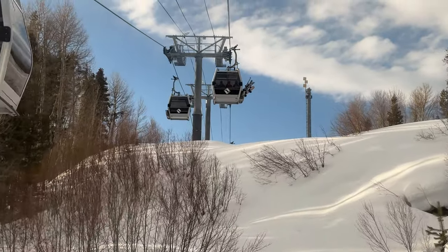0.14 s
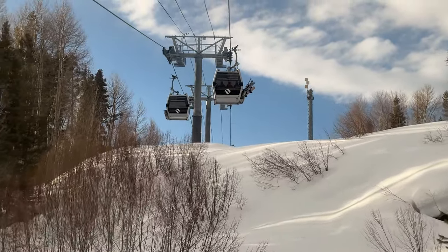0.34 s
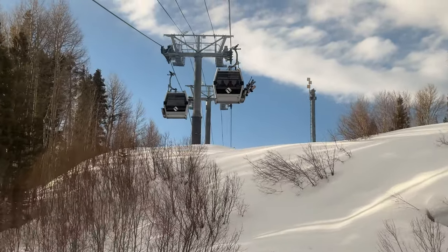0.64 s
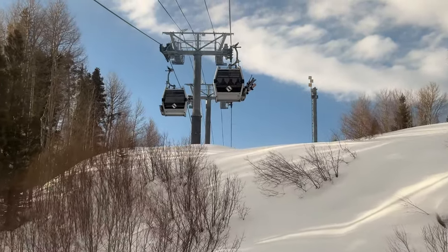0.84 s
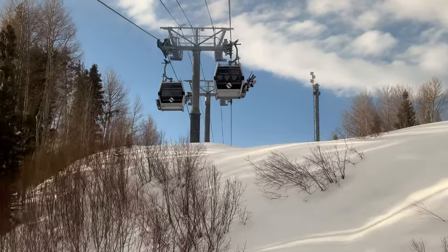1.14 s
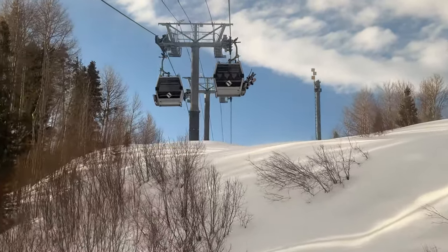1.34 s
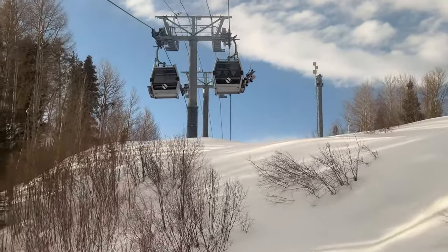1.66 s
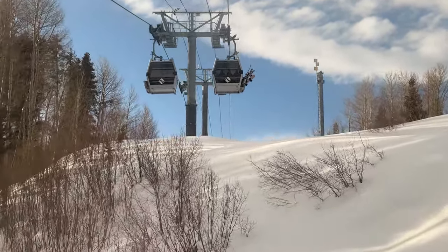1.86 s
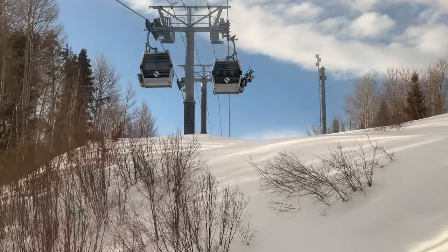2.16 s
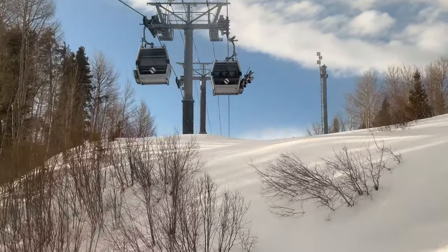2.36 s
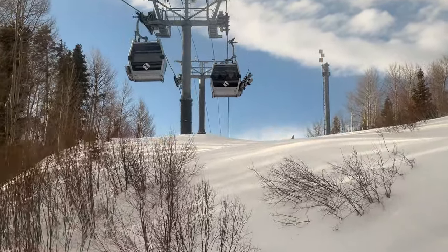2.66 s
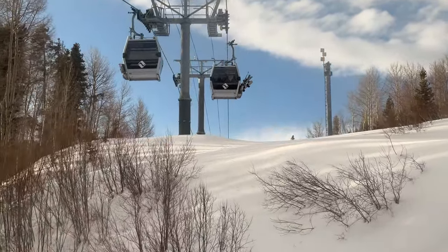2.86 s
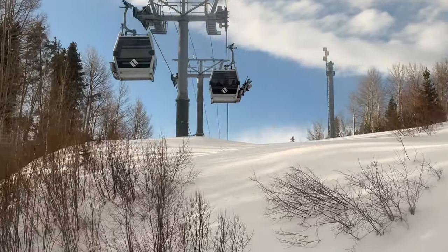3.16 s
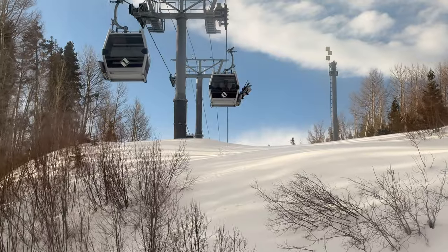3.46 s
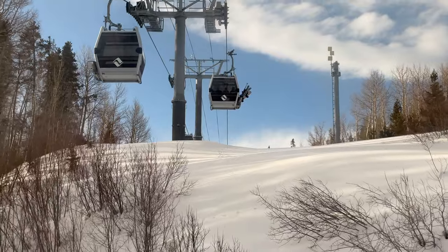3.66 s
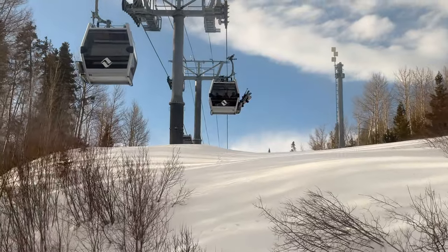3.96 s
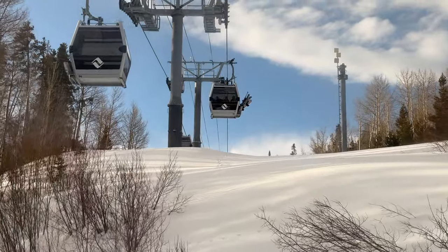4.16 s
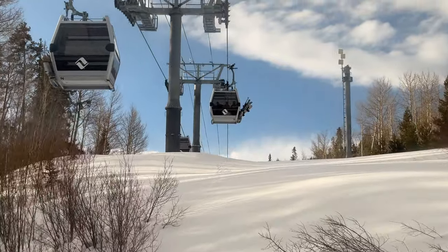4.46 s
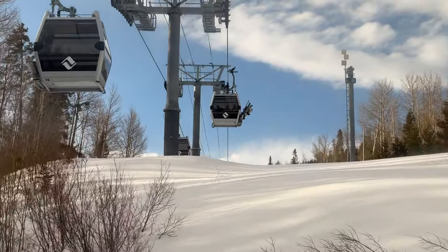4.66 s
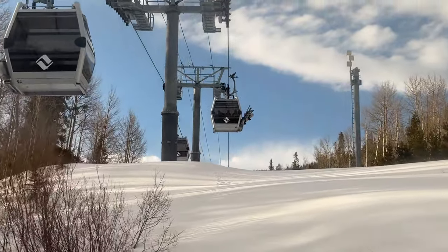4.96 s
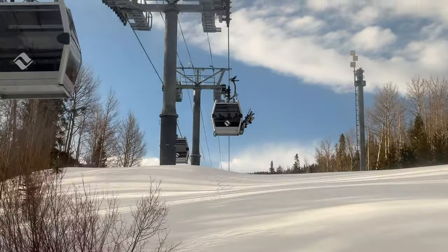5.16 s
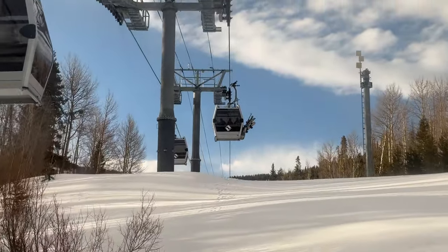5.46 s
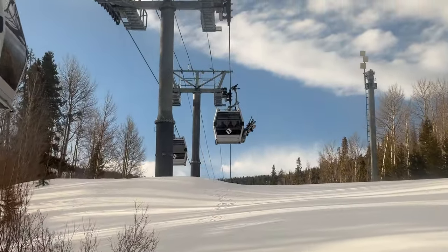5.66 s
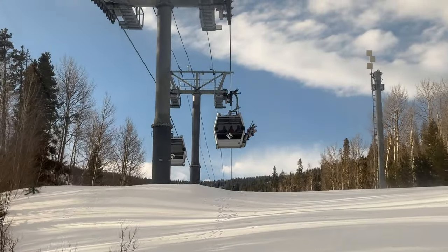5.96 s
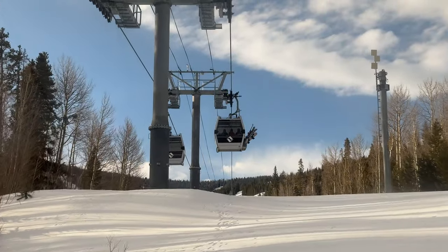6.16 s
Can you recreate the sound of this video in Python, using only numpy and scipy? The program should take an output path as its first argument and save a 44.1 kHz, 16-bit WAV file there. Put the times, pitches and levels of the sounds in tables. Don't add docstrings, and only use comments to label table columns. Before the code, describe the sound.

Close nylon rustling, small ticks, a short zip and hollow bench knocks over a deep, wavering cable hum that slowly swells.

```python
import sys
import numpy as np
from scipy import signal
from scipy.fft import rfft, irfft, next_fast_len
from scipy.io import wavfile
from scipy.ndimage import uniform_filter1d, map_coordinates

SR = 44100
rng = np.random.default_rng(int(sys.argv[2]) if len(sys.argv) > 2 else 0)


def gain_from_db(level_db):
    decades = np.asarray(level_db, float) / 20
    return 10 ** decades


def transcribe(signal):
    frames = np.atleast_2d(signal).T
    limited = np.clip(frames, -1, 1)
    pcm = np.round(limited * 32767).astype(np.int16)
    wavfile.write(sys.argv[1], SR, pcm)


N = 278271
TIME = np.arange(N) / SR

# start t/s, length t/s, level/dB, brightness level/dB
CLOTH_PULLS = [(0.0, 0.12, -56.5, 0), (.16, 0.13, -61, -1.5), (.43, 0.12, -62, 1), (.9, 0.37, -57, 1.5),
               (1.6, 0.16, -61.5, -2), (1.8, 0.18, -57.5, 1), (2.36, 0.15, -59, -6),
               (2.47, 0.13, -53.5, -1), (2.64, 0.12, -51.5, -4), (2.92, 0.15, -57.5, 1),
               (3.25, 0.31, -57.5, 0.5), (3.86, 0.22, -60, 9.5), (4.115, 0.097, -53, 0.5),
               (4.5, 0.16, -55, -2.5), (4.7, 0.058, -58.5, -3.5), (4.78, 0.048, -55.5, -4),
               (5.18, 0.18, -56.5, -1.5), (5.85, 0.14, -52.5, 1), (5.96, 0.17, -49.5, -1),
               (6.24, 0.074, -53, -1)]
# start t/s, length t/s, level/dB, brightness level/dB
CLOTH_JERKS = [(0.0, 0.035, -68, -1), (.13, 0.11, -60, 0.5), (.79, 0.057, -65, -3.5),
               (2.69, 0.041, -57.5, -2), (2.79, 0.066, -59, -2), (3.66, 0.073, -55, -2),
               (6.09, 0.05, -53, 3), (6.16, 0.071, -59, 2.5), (.56, 0.2, -59, 0.5), (.72, 0.2, -61, 1),
               (1.27, 0.076, -53, 0), (1.36, 0.12, -62.5, 0.5), (2.0, .35, -58.5, 1),
               (2.51, 0.028, -60, -13), (2.6, 0.18, -53, 1), (3.07, 0.18, -60.5, -1.5),
               (3.56, 0.18, -57, 1), (3.74, 0.33, -56, -1), (3.92, 0.22, -58, -3.5),
               (4.07, 0.088, -56.5, 3), (4.241, 0.18, -52, 1.5), (4.41, 0.25, -62, 8.5),
               (5.005, 0.065, -54.5, -4), (5.09, 0.028, -56, 3), (5.355, 0.088, -49.5, -3),
               (5.41, 0.14, -48, -1.5), (5.47, 0.13, -50.5, -2), (5.55, 0.27, -49.5, -0.5),
               (5.985, 0.13, -46.5, -1.5)]
# level/dB against the movement, share of brightness [ratio], rest level/dB, catch level/dB
CLOTH_LAYERS = [
    (4.5, -1.47, -61, 1.45),
    (1.5, -0.057, -66, 1.18),
    (-8.5, 0.64, -74, 0.25),
    (1, 1, -64, -0.13),
]
# f/Hz, density level/dB per Hz
RUB_SPECTRUM = [(180, -3), (300, 2), (370, 2.5), (500, -2.5), (800, -3.5), (1100, -16), (1500, -59)]
SCRATCH_SPECTRUM = [(700, -8), (1000, -1), (1350, -1), (1600, -5), (1850, -3), (2500, -6), (3000, -12.5),
                    (3900, -22.5)]
CRISP_SPECTRUM = [(2200, -18), (2800, -2), (3600, 1), (4500, -2), (5200, -35)]
SWISH_SPECTRUM = [(4000, -19), (4900, -2), (6500, -3), (8300, 2.5), (10000, -5), (11000, -13),
                  (13000, -17.5), (14200, -12), (15700, -12.5)]
# t/s, rib rate f/Hz, pressure level/dB
ZIP_STROKE = [
    (2.5, 355, -56),
    (2.54, 436, -45),
    (2.565, 424, -45),
    (2.59, 545, -42),
    (2.618, 692, -44),
    (2.652, 680, -43),
    (2.67, 545, -43),
    (2.696, 325, -45),
    (2.722, 240, -48),
]
# t/s, level/dB added to the overtones
RIB_SLIPS = [(2.515, -12), (2.527, -12), (2.572, -5), (2.598, -4), (2.612, -12), (2.644, -11), (2.655, 5),
             (2.665, -11), (2.679, -8), (2.687, -18), (2.72, -8)]
# f/Hz, level/dB
SLEEVE = [(250, -16), (430, -5), (520, -3), (610, 4), (760, -1), (1100, 5), (1230, -1), (1390, 6),
          (1600, -6)]
# t/s, peak level/dB, centre f/Hz, thud level/dB against the tick
CREASE_TICKS = [(0.5692, -37.5, 2168, -20), (0.6003, -40.5, 1170, -13), (.035, -49, 730, -8),
                (.214, -58, 970, -8), (.279, -43, 1330, -12), (.588, -50, 1160, -15),
                (0.6831, -43, 1160, -17), (0.7849, -35, 1970, -26), (.786, -39, 1140, -22),
                (1.17, -54, 1225, 10), (2.436, -49, 630, -8), (2.4642, -49, 700.5, -3),
                (2.519, -34, 1071, -4), (2.724, -36, 1300, -9), (2.759, -34, 1794, -18),
                (2.761, -32, 816, -13), (2.771, -34.5, 1450, -7), (2.8144, -38.5, 1180, -2),
                (3.0125, -40.5, 1200, -21), (3.458, -40, 1302, -1), (3.674, -37.5, 1215, -13),
                (3.7359, -41, 1260, -12), (3.737, -37, 2250, -13), (3.77, -39, 1290, -13),
                (3.826, -46, 840, -12), (3.855, -46, 696.7, 9.5), (3.91, -44, 700.5, -3),
                (3.928, -36.5, 830, -8), (3.9667, -35.5, 860, -16), (3.968, -36, 2900, -20),
                (4.07, -42, 652, 0), (4.114, -41, 902, -10), (4.16, -42, 1085, -16), (4.249, -43, 1890, -15),
                (4.3843, -41, 2330, 5.5), (4.4739, -43, 947.4, -1), (4.478, -36.5, 2187, -20),
                (4.62, -38, 2000, -13), (4.64, -38, 820.7, -2), (4.82, -44, 1802, -8),
                (5.2856, -43, 1170, 3), (5.3022, -41, 2500, -22), (5.419, -38, 696, 0),
                (5.833, -32.5, 2077, -2.5), (5.842, -40, 960, 0), (5.9728, -31.5, 1079, -6),
                (5.9917, -34, 1075, -27), (6.0444, -31.5, 875, -21), (6.137, -37, 924, -28),
                (6.2881, -51, 918, -3), (6.3024, -42, 1900, -10),
                (.517, -48, 1500, -20), (.617, -48, 750, -10), (.628, -50, 960, -12),
                 (.694, -48, 1350, -20), (.797, -41, 1700, -23), (.812, -43, 1900, -20),
                 (3.467, -44, 600, -8), (3.553, -44, 1330, -20), (3.567, -46, 1500, -20),
                 (3.63, -43, 2000, -20), (3.684, -38, 1200, -7), (3.7, -44, 950, -12),
                 (3.751, -48, 1450, -20), (3.762, -48, 1250, -20), (3.84, -39, 2350, -20),
                 (3.849, -39, 1850, -20), (3.868, -44, 1200, 0), (3.982, -45, 1750, -12),
                 (4.955, -54, 597, -8), (5.075, -49, 900, -10), (5.11, -44, 520, -3)]
# t/s, peak level/dB, 60 dB decay t/s
STATIC_SNAPS = [
    (3.345, -30, 0.03),
    (5.007, -31, 0.062),
    (5.0926, -26, 0.038),
    (5.358, -24, 0.024),
    (6.139, -25, 0.016),
    (6.3024, -27, 0.023),
]
# t/s, peak level/dB
BENCH_KNOCKS = [
    (5.007, -24.5),
    (5.365, -38),
    (5.418, -48),
]
# f/Hz, level/dB, 60 dB decay t/s
BENCH_MODES = [(259.9, -2, .08), (370, 11.5, 0.075), (457, 6, 0.053), (564, 11.5, 0.037), (674, 13, 0.025),
               (837, 7.5, 0.047), (1040, 4, 0.024), (1410, -7, 0.018), (1900, -19, .03), (2702, -10, 0.016)]
# start t/s, end t/s, f/Hz, width f/Hz, level/dB
SQUEAKS_AND_BRUSHES = [(.03, .36, 1250, 450, -61), (1.65, 1.74, 10800, 300, -72),
                       (3.655, 3.78, 7670, 70, -56.5), (3.655, 3.8, 13870, 220, -66),
                       (3.655, 3.7, 10000, 450, -63), (3.5, 3.7, 5100, 250, -66), (0, .3, 2200, 500, -63),
                       (.58, .66, 1000, 500, -59), (2.69, 2.75, 1100, 350, -50),
                       (6.07, 6.15, 3000, 500, -55), (3.52, 3.57, 9700, 500, -66),
                       (4.362, 4.4, 2370, 80, -53), (4.03, 4.09, 6200, 700, -59),
                       (5.9, 5.99, 2000, 110, -61), (6.095, 6.16, 4800, 1300, -52),
                       (.07, .16, 1200, 90, -59), (.2, .27, 1020, 70, -58)]
# t/s, f/Hz, level/dB, half width t/s
SOFT_BURSTS = [(.1, 403, -53, .012), (2.543, 440, -46, .006), (2.527, 301.7, -40.5, 0.0053),
               (2.666, 590, -38, .005), (2.716, 816, -44, 0.0055), (2.774, 325, -44.5, 0.0046),
               (3.681, 410, -54, .008), (4.197, 470, -42, 0.0045), (5.29, 252, -43.5, 0.0062),
               (5.37, 333, -37, 0.0064), (5.37, 543, -46.5, 0.0095), (5.41, 175.3, -38.5, .015),
               (5.429, 246, -42, 0.023), (5.465, 360.2, -38.5, 0.013), (5.52, 648, -47, .01),
               (5.58, 269.9, -43, 0.0092), (5.605, 361.5, -47, 0.01), (5.66, 280, -44.5, 0.013),
               (5.699, 194.1, -42, 0.031), (5.74, 373.3, -44, 0.011), (5.789, 176.1, -41, .015),
               (5.94, 248, -45, 0.01), (6.2, 182, -48, 0.032)]
# t/s, level/dB, f/Hz, 60 dB decay t/s
HANGER_JOLT = (1.04, -23, 33.5, 0.75)
# t/s, strand pitch f/Hz, strand level/dB
ROPE_STRAND = [(0.0, 81.5, -35.5), (.35, 82.86, -46.5), (.8, 82.84, -38), (.96, 82.7, -61),
               (1.2, 84.8, -40.5), (1.85, 85.13, -32), (2.4, 85.17, -35.5), (2.7, 85.37, -32.5),
               (3.45, 85.34, -34), (3.62, 84.96, -28), (3.83, 86.16, -36.5), (4.04, 85, -25),
               (4.24, 85.67, -34.5), (4.94, 85.4, -30), (5.18, 85.3, -29.5), (5.41, 85.4, -26),
               (6.03, 84.24, -30.5), (6.31, 84.6, -25.5)]
# multiple [count], level/dB against the drone
TWIST_MULTIPLES = [(2, -9), (4, -8), (8, -10), (10, -14), (12, -12), (18, -20)]
# f/Hz, density level/dB per Hz
SHELL_DRONE = [(12, -22), (20, -23), (65, -7.5), (90, -5.5), (111, -9.5), (135, -9.5), (226, -21.5),
               (334, -27.5), (500, -34), (650, -40.5), (1100, -120)]
# t/s, level/dB
SHELL_BUMPS = [(.45, -73), (.7, -62), (1.37, -49.5), (2.05, -52), (3.0, -56), (3.34, -49.5), (3.7, -46.5),
               (4.34, -52), (4.67, -56), (5.06, -51), (5.41, -44), (5.71, -48.5)]
# t/s, level/dB
CABIN_SWINGS = [(.4, -50), (.9, -35), (1.67, -31), (1.95, -38), (2.2, -46), (2.5, -34), (2.8, -42),
                (3.05, -28.5), (3.35, -31.5), (3.87, -41), (4.17, -33.5), (4.58, -31), (5.18, -35),
                (5.65, -54), (6.03, -39)]
# t/s, level/dB
WHEEL_LOADS = [(.8, -38), (1.08, -34), (1.38, -31.5), (1.78, -31), (2.0, -36), (2.29, -28), (2.49, -29.5),
               (2.8, -31), (3.02, -34), (3.4, -29), (3.74, -39), (3.95, -39), (4.44, -34), (4.94, -30.5),
               (5.2, -43), (5.65, -40), (5.85, -40), (6.04, -34), (6.3, -32)]
# f/Hz, correlation [ratio]
PORT_LIKENESS = [(25, 0.81), (130, 0.76), (400, 0.79), (1000, 0.55), (1500, 0.93), (1900, 0.98),
                 (7000, 0.93), (13000, 0.85)]
# f/Hz, phase [half cycles]
NEAR_PHASE = [(100, 0), (600, .45), (2050, 0), (3500, .18), (5900, 0), (10000, .22), (11800, 0),
              (15700, -.67)]
# f/Hz, level/dB
LEFT_NEARER = [(200, 1), (400, 0.5), (800, 1.6), (1300, -.5), (2200, 1)]

STRANDS = 6
CANCEL_HZ = 8250
SIDES = np.array([[1], [-1]])


def unit(x):
    return x / np.sqrt(np.mean(x ** 2) + 1e-20)


def along(points, hz):
    f, v = np.transpose(points)
    return np.interp(np.log(hz + 1), np.log(f + 1), v)


def curves(rows):
    s, *cols = np.transpose(rows)
    return [np.interp(TIME, s, c) for c in cols]


def wobble(rate):
    knots = rng.standard_normal(int(N * rate / SR) + 4)
    steps = np.arange(8 * len(knots)) / 8
    return np.interp(TIME * rate, steps, map_coordinates(knots, [steps], mode="nearest"))


def filtered(x, response):
    m = next_fast_len(N + SR // 2)
    return irfft(rfft(x, m) * response(np.fft.rfftfreq(m, 1 / SR)), m)[..., :N]


def swells(rows, half_s, rest_db):
    s, db = np.transpose(rows)[:, :, None]
    t = TIME[::50]
    bells = np.sum(gain_from_db(db) * np.exp(-.5 * ((t - s) / half_s) ** 2), axis=0)
    return gain_from_db(rest_db) + np.interp(TIME, t, bells)


def at_ports(pair, spectrum):
    def split(hz):
        apart = np.clip(abs(hz - CANCEL_HZ) / 400 - 1, 0, 1)
        turn = apart * np.arccos(np.clip(along(PORT_LIKENESS, hz), -1, 1)) / 2
        return gain_from_db(along(spectrum, hz)) * [np.cos(turn), np.sin(turn)]

    same, other = filtered(pair, split)
    return np.array([same + other, same - other]) / np.sqrt(np.mean(same ** 2))


def catches(rate, fade_s):
    kicks = (rng.random(N) < rate / SR) * rng.random(N)
    pull = signal.lfilter([1], [1, -np.exp(-1 / (fade_s * SR))], kicks)
    return unit(pull - uniform_filter1d(pull, SR // 12))


def patches(depth_db):
    z = signal.stft(rng.standard_normal((2, N)), nperseg=256)[2]
    field = uniform_filter1d(rng.standard_normal(z.shape[1:]), 5, 0)
    field = uniform_filter1d(field, 8, 1)
    return signal.istft(z * gain_from_db(depth_db * unit(field)), nperseg=256)[1][:, :N]


def movement(bright_share):
    power = np.zeros(N)
    start_s, stop_db_per_s = 0.013, 270
    for rows, first_db, last_db in ((CLOTH_PULLS, -9, 0), (CLOTH_JERKS, 0, -4.5)):
        for s, length, db, bright_db in rows:
            span = slice(round(s * SR), round((s + length) * SR) + SR // 5)
            t = TIME[span] - s
            shape_db = np.interp(t, [0, length], [first_db, last_db])
            shape_db = shape_db - stop_db_per_s * np.clip(t - length, 0, None)
            gain = np.clip(t / start_s, 0, 1) * gain_from_db(db + bright_share * bright_db + shape_db)
            power[span] += gain ** 2
    return power


def clothing():
    shared = 0.23 * catches(300, fade_s=0.001) + catches(70, fade_s=0.006)
    shared = np.minimum(shared, 2.6)
    spectra = (RUB_SPECTRUM, SCRATCH_SPECTRUM, CRISP_SPECTRUM, SWISH_SPECTRUM)
    out = 0
    for (lift_db, bright_share, rest_db, catch_db), spectrum in zip(CLOTH_LAYERS, spectra):
        gain = np.sqrt(gain_from_db(rest_db) ** 2 + gain_from_db(lift_db) ** 2 * movement(bright_share))
        noise = patches(depth_db=1.32) * gain_from_db(catch_db * shared)
        out = out + gain * at_ports(noise, spectrum)
    return out


def zip_stroke():
    rib_hz, press_db = curves(ZIP_STROKE)
    rib_hz = uniform_filter1d(rib_hz, SR // 70)
    phase = 2 * np.pi * np.cumsum(rib_hz * (1 + .015 * wobble(220))) / SR
    edge_s = np.minimum(TIME - ZIP_STROKE[0][0], ZIP_STROKE[-1][0] - TIME)
    stroke = np.clip(edge_s / 0.014, 0, 1)
    slip_db = sum(db * np.exp(-.5 * ((TIME - s) / .0042) ** 2) for s, db in RIB_SLIPS)
    low_db = -5 + np.clip(slip_db / 4, -2, 0) - 14 * np.clip((TIME - 2.672) / .008, 0, 1)
    partials = 0
    for k, db, pan_db in ((1, low_db, 2), (2, slip_db, -1), (3, -19 + slip_db, 0)):
        level_db = along(SLEEVE, k * rib_hz) + db + 0.87 * wobble(130) + pan_db * SIDES
        partials = partials + gain_from_db(level_db) * np.sin(k * phase)
    scrape = wobble(5000) * (1 + np.cos(phase))
    grate = filtered(scrape, lambda hz: np.clip(hz / 900, 0, 1) ** 2)
    grate = gain_from_db(-45.0 + 1.45 * catches(310, fade_s=0.0043)) * grate
    return stroke * (gain_from_db(press_db + 7.5) * partials + gain_from_db(press_db - press_db.max()) ** .5 * grate)


def ticks():
    out, t = np.zeros((2, N + SR)), np.arange(SR // 20) / SR
    events = CREASE_TICKS
    for (s, db, hz, thud_db), pan_db in zip(events, 4 * rng.standard_normal(len(events))):
        ring = gain_from_db(-60 * t * hz / 10) * (1 - np.exp(-t * hz * 1.2)) * np.sin(2 * np.pi * hz * t)
        thud = gain_from_db(thud_db - 60 * t / 0.0068) * np.sin(2 * np.pi * 640 * t)
        scratch = 0.26 * gain_from_db(-60 * t / 0.022) * rng.standard_normal(len(t))
        start = round(s * SR)
        out[:, start:start + len(t)] += gain_from_db(db + 8.0 + .3 * pan_db * SIDES) * (ring + thud + scratch)
    return filtered(out[:, :N], lambda hz: 1 / (1 + 1j * hz / 3600) ** 2)


def snaps():
    out, t = np.zeros(N + SR), np.arange(SR // 10) / SR
    for s, db, t60 in STATIC_SNAPS:
        out[round(s * SR):][:len(t)] += gain_from_db(db - 10.5 - 60 * t / t60) * rng.standard_normal(len(t))

    def bright(hz):
        high_pass = 1j * hz / 2500 / (1 + 1j * hz / 2500)
        return high_pass ** 2 / (1 + 1j * hz / 8000) ** 2

    return filtered(out[:N], bright)


def knocks():
    out, t = np.zeros(N + SR), np.arange(SR // 4) / SR
    for s, db in BENCH_KNOCKS:
        ring = 0
        for hz, level, t60 in BENCH_MODES:
            decay = gain_from_db(level + rng.normal(0, 1.4) - 60 * t / min(t60, .12))
            ring = ring + decay * np.sin(2 * np.pi * hz * t)
        out[round(s * SR):][:len(t)] += gain_from_db(db - 12.0) * ring * (1 - np.exp(-t / 0.0021))
    return out[:N]


def squeaks():
    out, t = np.zeros(N + SR), np.arange(SR // 2) / SR
    for start, end, hz, width_hz, db in SQUEAKS_AND_BRUSHES:
        drift = map_coordinates(rng.standard_normal(1400), [t * width_hz * 2])
        shape = np.clip(t / 0.012, 0, 1) * np.clip((end - start - t) / (.5 * (end - start)), 0, 1)
        tone_part = (0.4 + 1.0 * drift) * np.sin(2 * np.pi * hz * t)
        out[round(start * SR):][:len(t)] += gain_from_db(db + 5.5) * shape * tone_part
    return out[:N]


def soft_bursts():
    out, t = np.zeros(N + SR), np.arange(-SR // 10, SR // 10) / SR
    for (s, hz, db, half_s), turn in zip(SOFT_BURSTS, rng.random(len(SOFT_BURSTS))):
        bell = np.exp(-.5 * (t / half_s) ** 2)
        burst = gain_from_db(db + 3.5) * bell * np.sin(2 * np.pi * (hz * t + turn))
        out[round(s * SR) - SR // 10:][:len(t)] += burst
    return out[:N]


def phase_shifted(pair):
    def response(hz):
        flip = np.clip((1350 - abs(hz - CANCEL_HZ)) / 1000, 0, 1)
        lag = flip + (1 - flip) * along(NEAR_PHASE, hz)
        return np.exp(1j * np.pi / 2 * lag * SIDES) * gain_from_db(along(LEFT_NEARER, hz) / 2 * SIDES)

    return filtered(pair, response)


def jolt():
    s, db, hz, t60 = HANGER_JOLT
    t = np.clip(TIME - s, 0, None)
    swing = np.sin(2 * np.pi * hz * t) + 0.51 * np.sin(2 * np.pi * 1.75 * hz * t)
    return gain_from_db(db - 60 * t / t60) * (1 - np.exp(-t / 0.016)) * swing


def tone(hz, drift_hz, flutter_db):
    turns = np.cumsum(hz + drift_hz * wobble(4.042)) / SR + rng.random()
    return unit(gain_from_db(flutter_db * wobble(4.6)) * np.sin(2 * np.pi * turns))


def rope():
    strand_hz, strand_db = curves(ROPE_STRAND)
    twist_hz = uniform_filter1d(strand_hz, SR // 2) / STRANDS
    turns = np.cumsum(twist_hz * STRANDS) / SR
    strand = np.sqrt(2) * np.sin(2 * np.pi * turns + .3 * SIDES) * gain_from_db(1.9 * SIDES)
    strand = gain_from_db(strand_db + 0.5 * wobble(14.0)) * strand

    growth_db = uniform_filter1d(strand_db - strand_db.mean(), SR)
    below = gain_from_db(-7) * tone(twist_hz * (STRANDS - 1), drift_hz=.4, flutter_db=2)
    below = below + gain_from_db(-6.5) * tone(75, drift_hz=.7, flutter_db=2)
    below = swells(WHEEL_LOADS, half_s=0.064, rest_db=-45 + growth_db) * below

    sway = gain_from_db(-7.5) * tone(twist_hz * STRANDS / 2, drift_hz=0.87, flutter_db=1.0)
    sway = sway + gain_from_db(-8.5) * tone(39.7, drift_hz=0.5, flutter_db=-2.5)
    sway = swells(CABIN_SWINGS, half_s=0.1, rest_db=-43) * sway

    others = sum(gain_from_db(db) * tone(k * twist_hz, drift_hz=1.493, flutter_db=2.6) for k, db in TWIST_MULTIPLES)
    drone = gain_from_db(-1.0) * at_ports(rng.standard_normal((2, N)), SHELL_DRONE)
    shaken = swells(SHELL_BUMPS, half_s=0.08, rest_db=-45 + 0.12 * growth_db)
    shell = shaken * (gain_from_db(1.5) * others + gain_from_db(3.0) * drone) * gain_from_db(.5 * SIDES)
    return strand + below + sway + shell


def scene():
    near = clothing() + zip_stroke() + ticks() + snaps() + knocks() + squeaks() + soft_bursts()
    return phase_shifted(near) + jolt() + rope()


def band_limit(x):
    return signal.sosfilt(signal.butter(12, 15890, fs=SR, output="sos"), x)


def record(dry):
    mix = filtered(dry, lambda hz: hz < 15750)
    return band_limit(mix)


dry = scene()
out = record(dry)
transcribe(out)
```